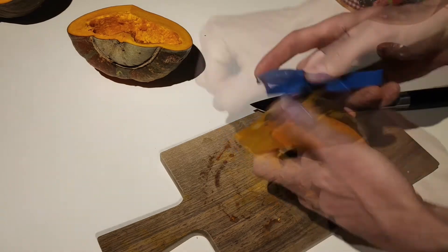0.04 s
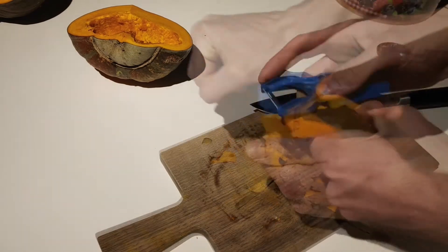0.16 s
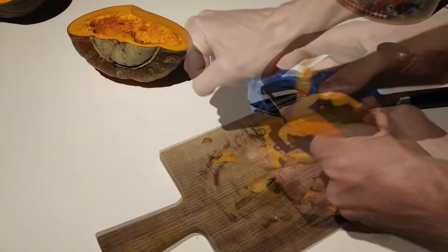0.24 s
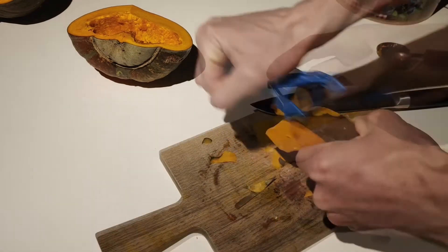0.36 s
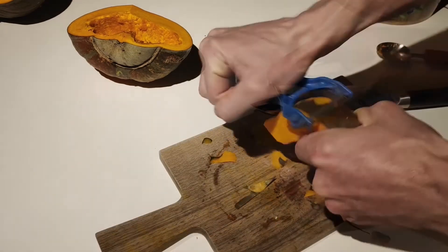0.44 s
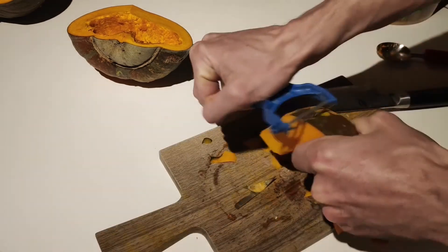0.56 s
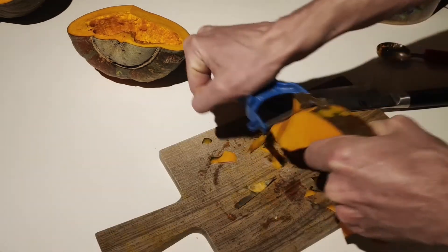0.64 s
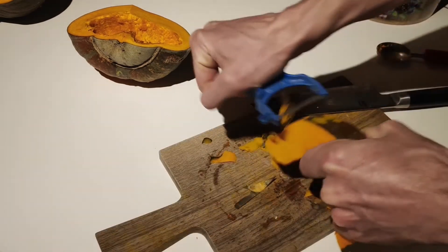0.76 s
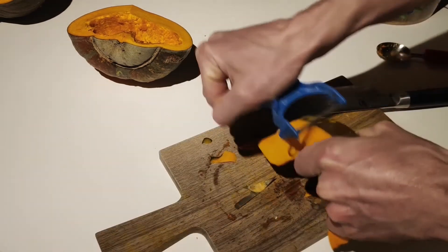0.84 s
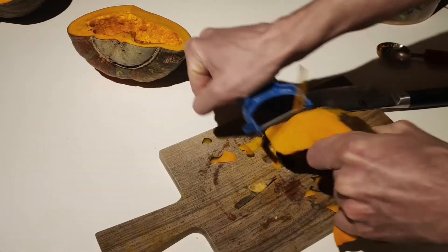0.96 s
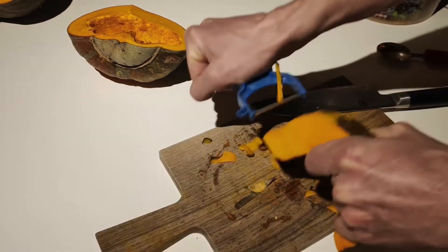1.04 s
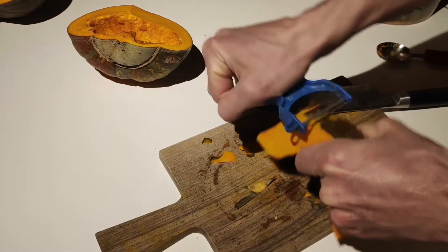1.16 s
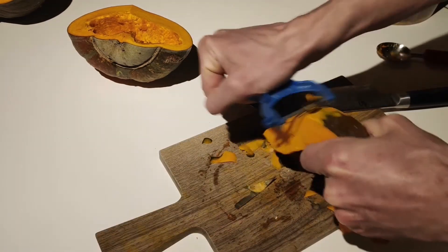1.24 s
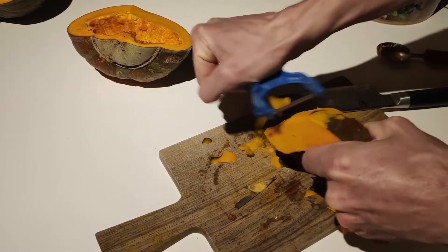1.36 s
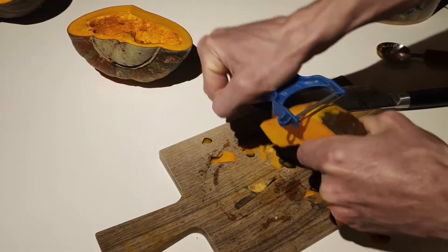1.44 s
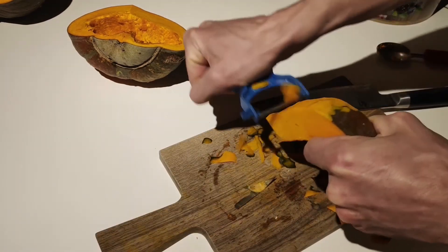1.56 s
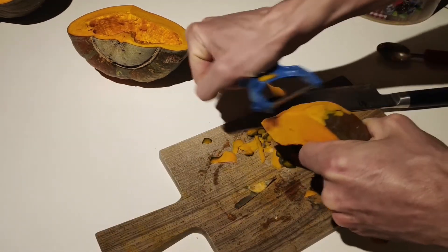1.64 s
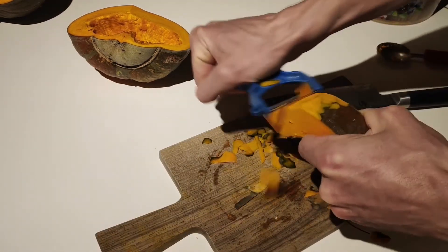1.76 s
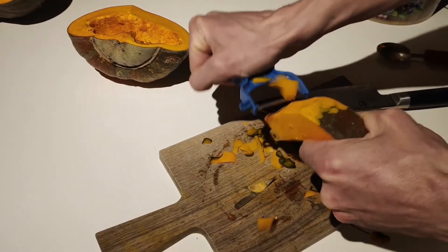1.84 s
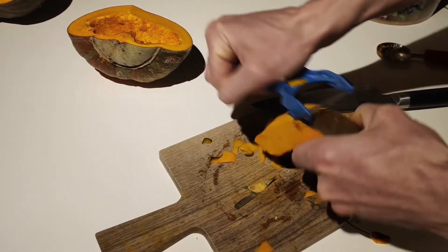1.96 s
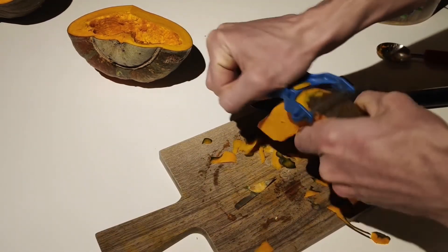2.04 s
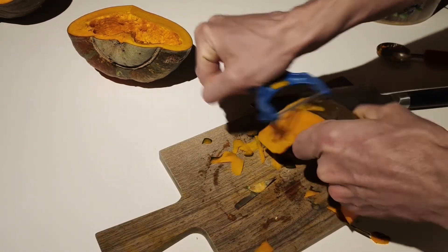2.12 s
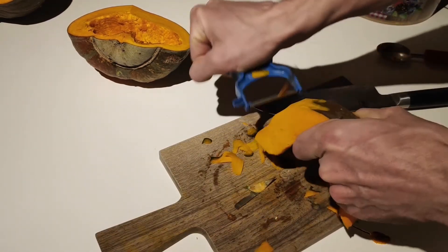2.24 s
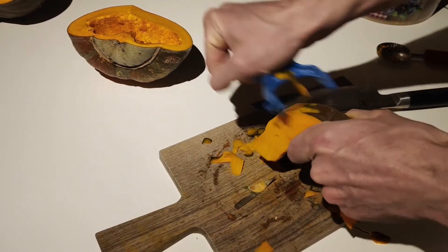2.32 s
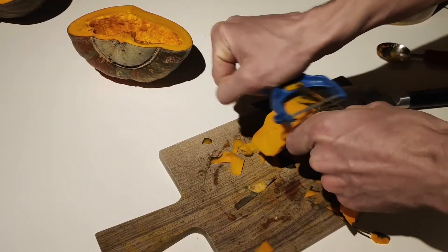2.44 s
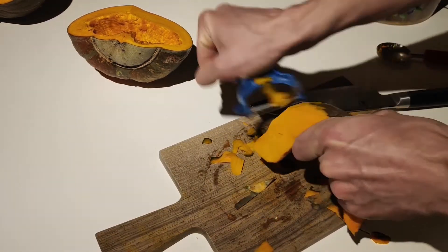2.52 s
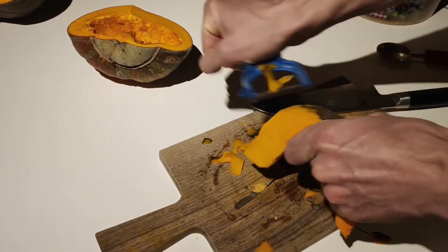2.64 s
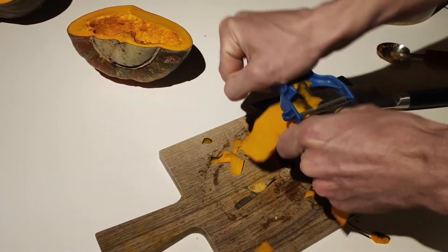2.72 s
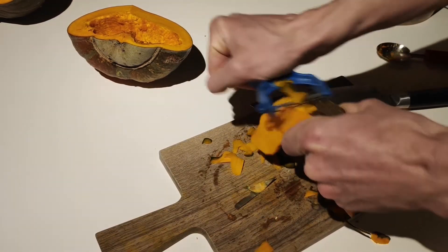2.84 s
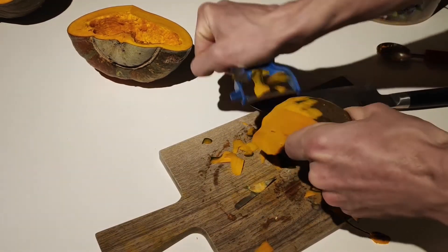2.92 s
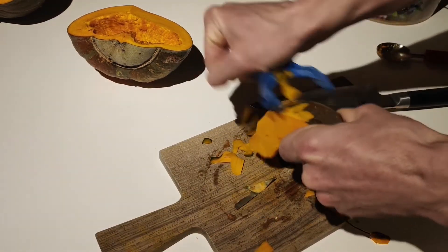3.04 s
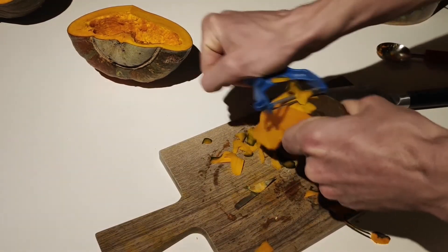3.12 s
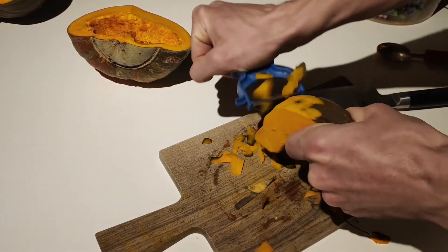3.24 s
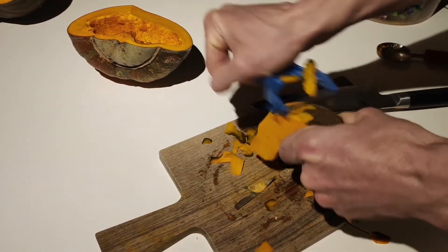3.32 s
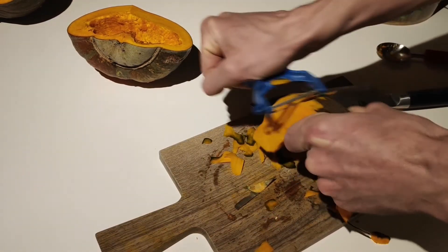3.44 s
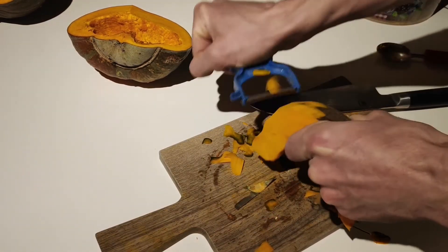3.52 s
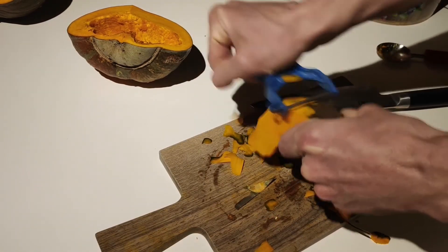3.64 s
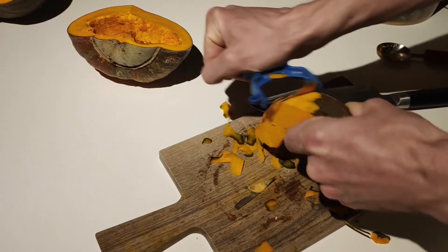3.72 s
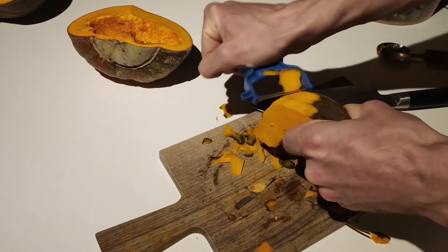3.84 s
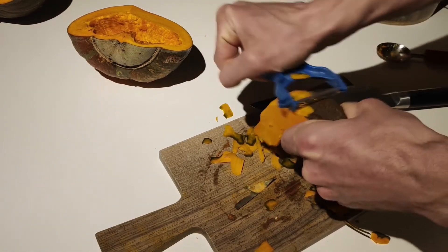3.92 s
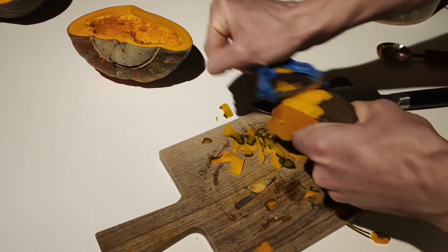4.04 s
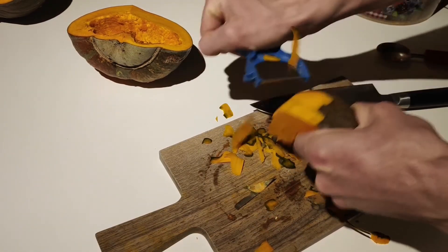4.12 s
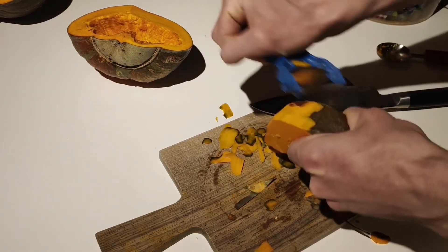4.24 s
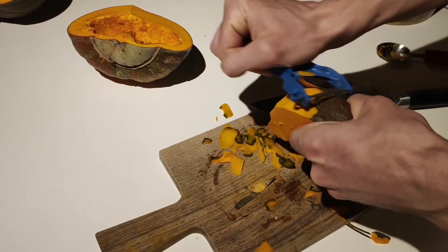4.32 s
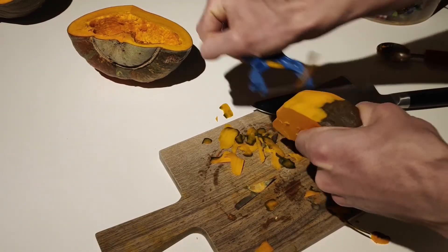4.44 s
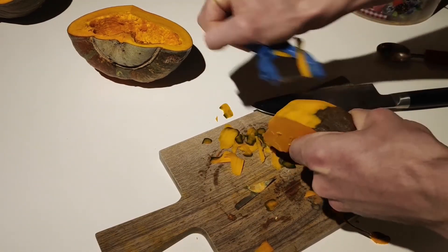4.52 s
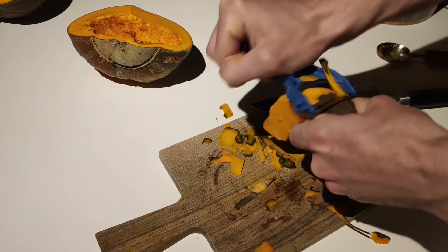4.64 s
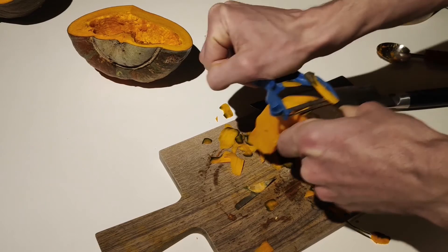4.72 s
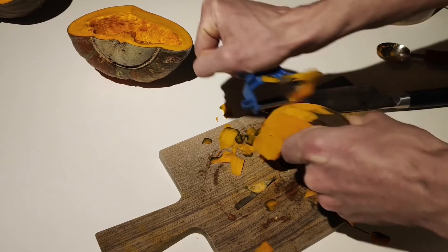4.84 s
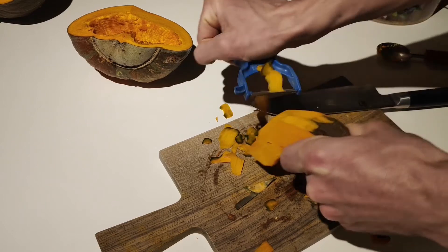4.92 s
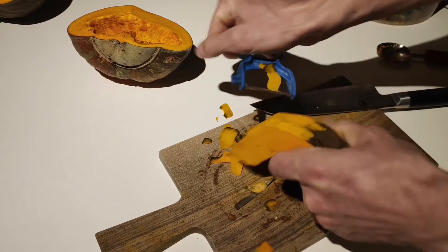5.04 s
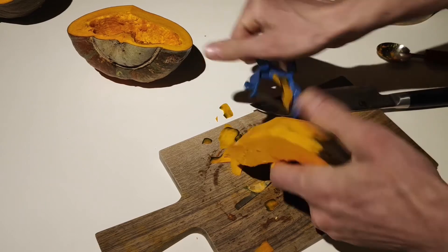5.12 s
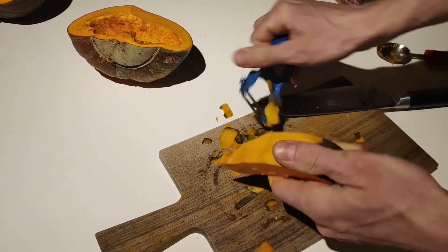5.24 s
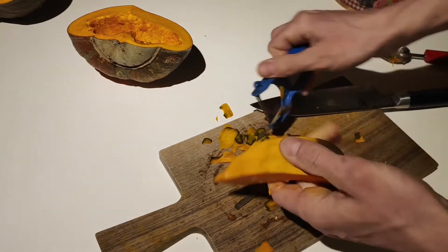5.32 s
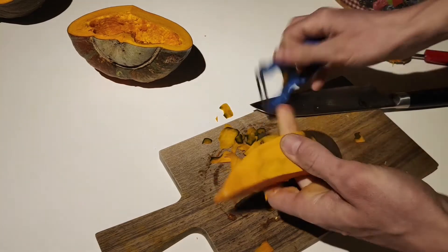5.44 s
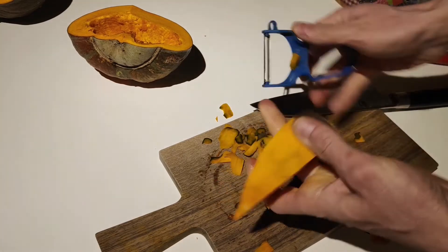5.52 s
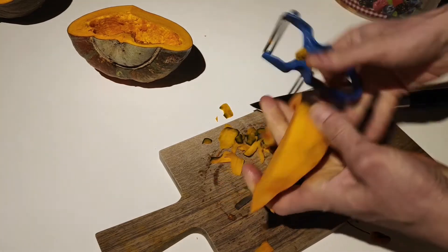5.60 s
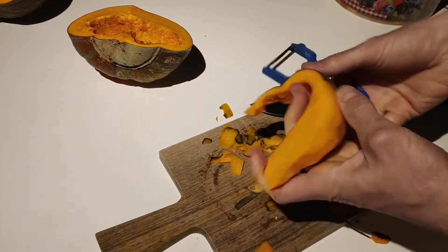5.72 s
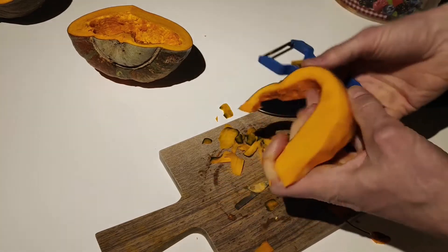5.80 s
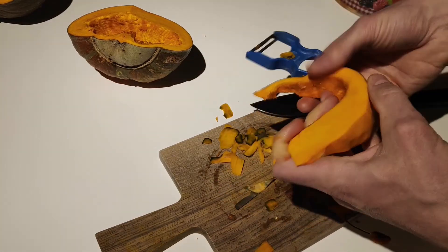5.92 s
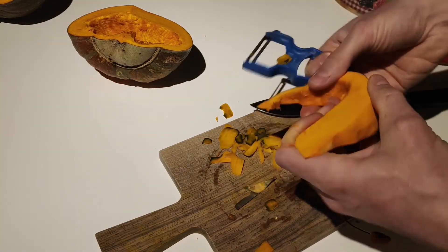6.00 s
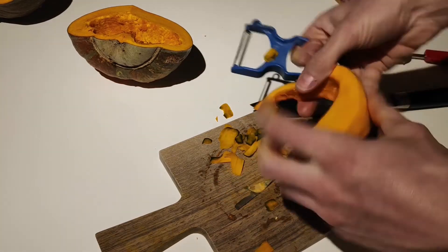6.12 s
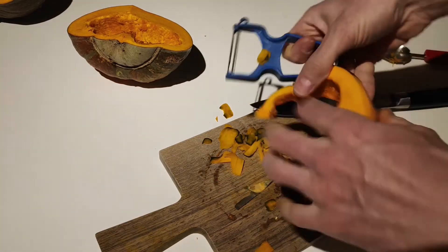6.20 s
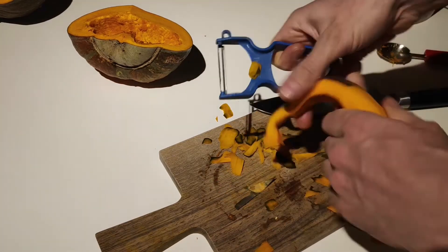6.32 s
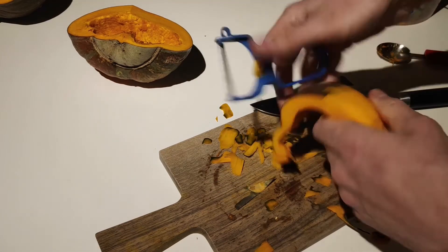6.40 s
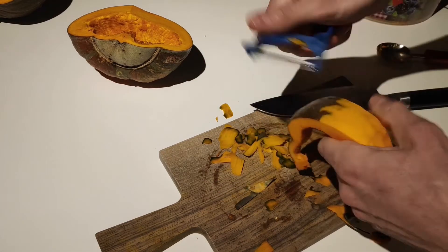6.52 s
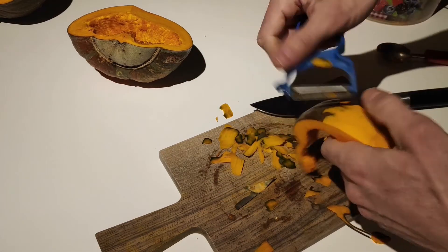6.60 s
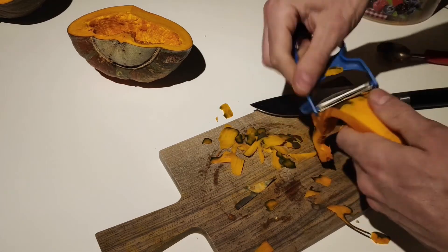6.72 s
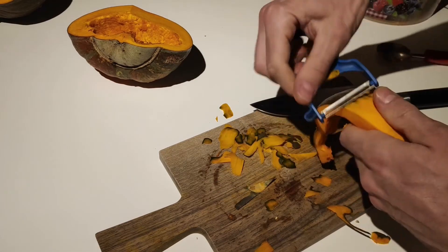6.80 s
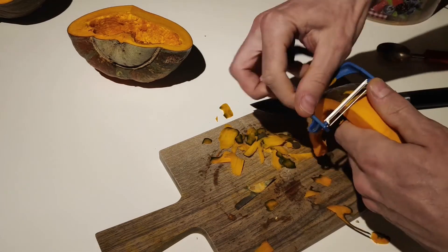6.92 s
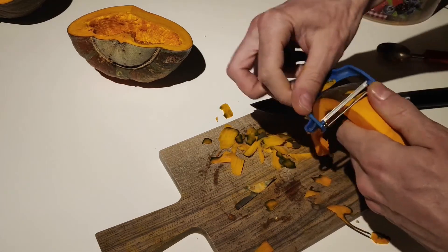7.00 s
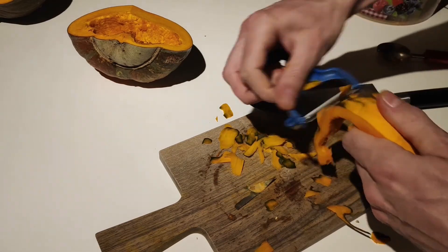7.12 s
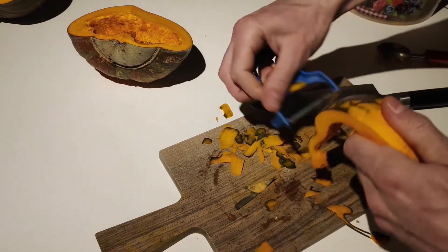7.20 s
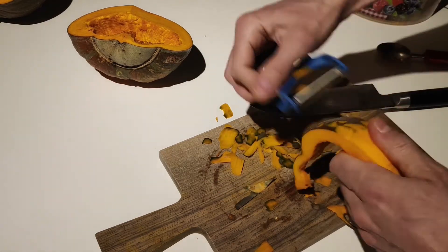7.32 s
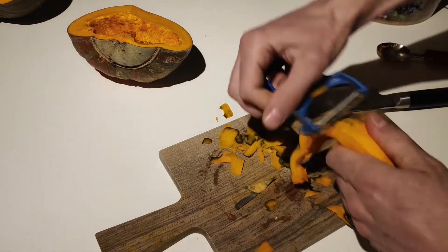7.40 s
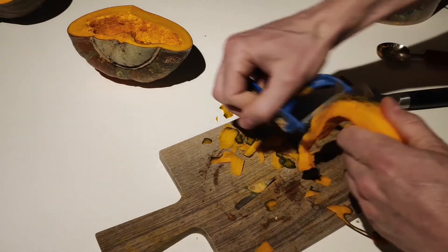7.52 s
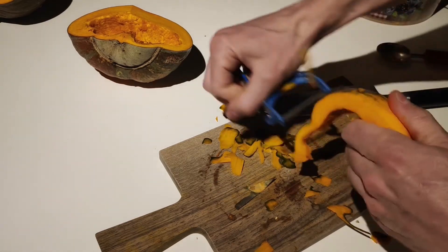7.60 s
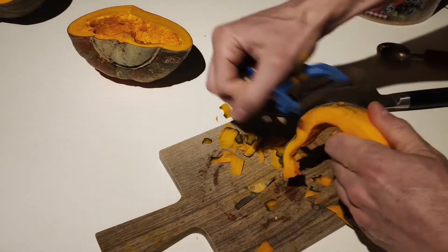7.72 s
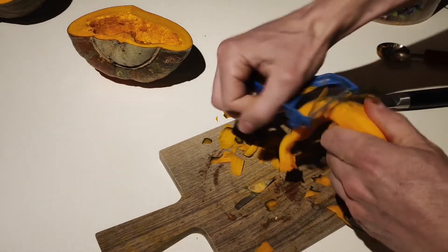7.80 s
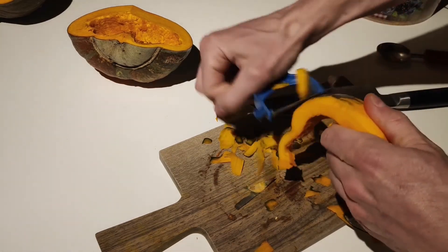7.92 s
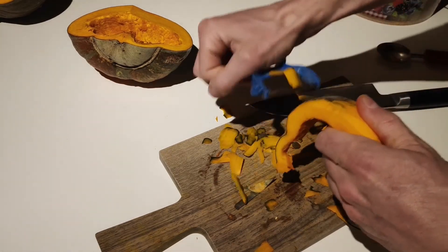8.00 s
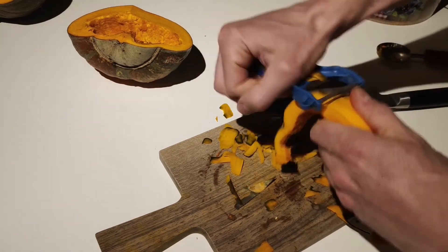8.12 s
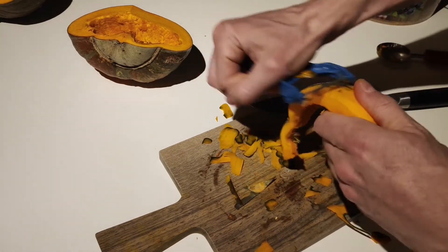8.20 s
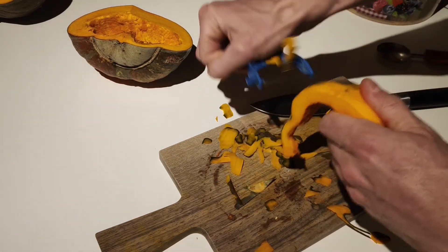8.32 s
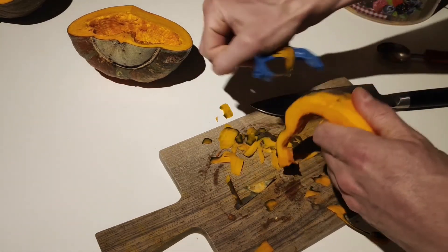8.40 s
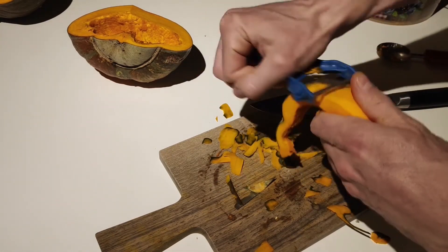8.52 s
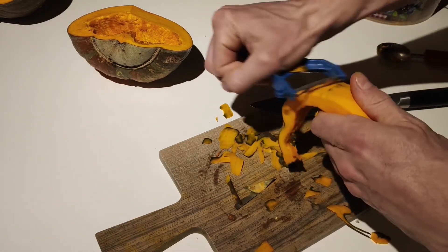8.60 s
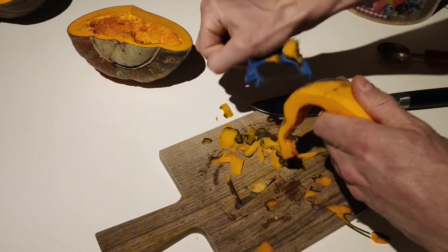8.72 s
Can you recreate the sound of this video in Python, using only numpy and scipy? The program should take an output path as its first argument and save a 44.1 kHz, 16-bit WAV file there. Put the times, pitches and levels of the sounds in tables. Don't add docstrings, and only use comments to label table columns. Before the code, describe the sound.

A small, hard kitchen heard through a close stereo microphone, with a low, slightly wavering refrigerator hum and soft fan air throughout. From 0.1 seconds a swivel peeler strikes and scrapes a pumpkin wedge, roughly three strokes each second. Each begins with a millisecond-scale rattling clack, swells into bright, dense, dry tearing, and ends in a snap. Dull little thumps come from the wedge; thin, faint high blade rings follow some strokes, clearest near 1.3, 2.5 and 4.4. Knocks are strongest around 1.5 and 3.7 to 4.6. After 4.9, cutting stops: irregular loose-blade ticks, peel crackles and finger rustles cluster around 5.1 to 5.7, thin out near 6, then return around 6.5. A light landing at 6.7 precedes renewed tearing strokes at about 7.1, 7.5, 7.8, 8.2 and 8.5, with crisp flicks and snaps through 8.7.

```python
import sys
import numpy as np
from scipy import signal
from scipy.fft import rfft, irfft
from scipy.io import wavfile
from scipy.ndimage import uniform_filter1d, minimum_filter1d

SR = 44100
rng = np.random.default_rng(int(sys.argv[2]) if len(sys.argv) > 2 else 0)


def persist_wave(psi):
    counts = np.round(np.clip(psi, -1, 1) * 32767).astype(np.int16)
    wavfile.write(sys.argv[1], SR, np.atleast_2d(counts).T)


def ratio(d):
    e = np.asarray(d, float) / 20
    return 10 ** e


N = 385875

# multiple, level_db
HUM_MULTIPLES = [(2, -5), (4, -4), (5, 0), (6, -5), (8, -10), (10, -8.5), (12, -9.5), (13, -8), (14, -6),
                 (15, -8), (16, -8.5), (17, -17), (19, -14), (23, -16), (27, -17)]
# frequency_hz, density_db (per Hz)
AIR_COLOUR = [(10, 1.5), (30, 0), (95, -13.5), (125, -4.5), (170, 4.5), (235, -9.5), (470, -8), (690, -9.5),
              (910, -9.5), (1300, -18), (2230, -18), (3480, -26.5), (5800, -26), (12000, -29.5),
              (16000, -37)]
# frequency_hz, likeness (1 = same)
AIR_LIKENESS = [(60, 0.74), (180, 1), (550, 0.45), (1650, 0.19), (4970, -1), (15000, -1.7)]
# frequency_hz, left_minus_right_db
PORT_TILT = [(500, 0.2), (2400, 0.5), (6000, -1), (7300, -11), (9000, 1), (11600, 10), (13000, 12),
             (16000, 15.5)]
# frequency_hz, density_db (per Hz)
KNOCK_COLOUR = [(900, -84), (1500, -38), (3000, -12), (4600, -2.5), (5900, -2), (8000, 2.5), (10500, 4.5),
                (12300, 3.5), (15300, 6), (16500, 1)]
# frequency_hz, density_db (per Hz)
TEAR_COLOUR = [(2500, -44.5), (4400, -5), (5700, 2.5), (7000, 0), (8500, 5), (10500, 5.5), (13000, 0.5),
               (15500, -6), (16500, -9)]
# frequency_hz, level_db, t60_s
BLADE_MODES = [(3780, -21, .012), (5900, -14, .012), (8300, -19, .035), (10300, -20, .02),
               (11850, -26, .04), (12200, -14, .015), (13650, -25, .04)]
# frequency_hz, level_db, t60_s
FRAME_MODES = [(900, -11, 0.0057), (1420, -20, 0.014), (1820, -12, 0.0011), (2270, -11, 0.012),
               (2880, -2.5, 0.0048)]
# frequency_hz, level_db, t60_s
FREE_BLADE_MODES = [(9950, -6, .13), (10520, -4, .18), (11820, 0, .28), (13650, -2, .24), (14920, -4, .2)]
# start_s, peak_db, pitch_hz
THUMPS = [(0.431, -21.5, 610), (1.183, -20.5, 630), (1.517, -15, 820), (2.019, -21, 605), (2.4, -26, 925),
          (2.852, -16, 710), (3.07, -29, 1010), (4.299, -35, 870), (4.639, -16, 780), (8.147, -14.5, 1000),
          (8.529, -24, 740)]
# start_s, level_db
RELEASES = [
    (0.3, -50),
    (1.315, -37),
    (2.527, -34),
    (2.565, -35),
    (2.93, -36),
    (3.905, -41),
    (4.3, -46),
    (4.437, -35),
    (8.29, -42),
]
# start_s, peak_db, rattle_ms, frame_db, skid_db
LANDINGS = [(0.0851, -10.5, 1.4, -16, -34), (0.4293, -11.5, 1.4, -23, -33), (0.5646, -9.5, 0.62, -3, -28),
            (0.8707, -3.5, 1, -10.5, -33), (1.1796, -6.5, 1.6, -15, -29.5), (1.4419, -4.5, 0.7, -14, -30),
            (1.7019, -5.5, 1.8, -3, -45), (2.0181, -9, 1.46, -6, -33.5), (2.4016, -2, 1.35, -16, -36),
            (2.7427, -2, 1.5, -11, -29.5), (3.072, -2.5, 1.6, -7.5, -31.5), (3.3674, -3.5, 2.2, -6.5, -28),
            (3.6553, -0.5, 1.06, -11.5, -31), (3.904, 2.5, 1.15, -17, -26.5), (4.298, -3, 1.5, -16, -35),
            (4.6357, 1, 1.94, -9, -30.5), (5.125, -9, 0.74, -17, -36), (5.267, -13.5, 1.8, -12, -35.5),
            (5.681, -10, 0.89, -13, -39), (6.7122, -8.5, 1.47, -9, -48), (7.437, -7.5, 0.51, -13, -35.5),
            (7.7979, -1.5, 0.62, -18, -38), (8.144, -3.5, 0.94, -13, -42), (8.527, -3.5, 1.9, -4, -34)]
LANDING_LIFTS = [-8, 0.5, 1, -1.5, 4, 0, 0, -3.5, 0, -0.5, -5, -2, -0.5, -1, -1.5, -1.5, -6, -7, 1, -0.5,
                 -2, 2, -0.5, -0.5]
# start_s, peak_db, rattle_ms, frame_db
CATCHES = [(0.6318, -8, 1, -8.5), (0.666, -8.5, 1.1, -12), (0.9924, -14.5, 2.4, -20),
           (1.1847, -6, 1.25, -19), (1.257, -8.5, 1.04, 4), (1.3134, -11, 1.9, -22), (1.4451, -8, 0.7, -5),
           (1.5166, 4.5, 1.58, -10), (1.5644, -3.5, 0.83, -9), (1.5754, -8, 0.98, -21),
           (1.8437, -14, 0.8, -14), (2.5254, -7, 1.5, -10), (2.5332, -9, 0.61, -9), (2.9144, -4.5, 1.1, -8),
           (2.929, -3, 1.3, -15), (3.2234, -2, 0.73, -26), (3.925, -13, 0.95, -14), (4.0718, -3, 1.26, -5),
           (4.087, -10.5, 1.2, -14), (4.4357, -6, 3.6, -13.5), (4.8438, -10, 1.1, -33),
           (4.8693, -12.5, 0.97, -30), (7.1825, -9.5, 1.4, -13), (7.198, -12.5, 1.1, -14),
           (7.448, -7.5, 1, -13), (7.5814, -8, 0.87, -9), (7.5997, -8, 0.71, -19),
           (7.942, -2.5, 0.91, -15.5), (8.274, -3, 1.2, -25), (8.6864, -2, 1, -6)]
CATCH_LIFTS = [-1, -3, -9, -1, -6, 1.5, 1, -7.5, -1, -3, -11, -8, -11, -11, -8, -7.5, 0, -1.5, 0, -1.5,
               -0.5, 1, 2, 2, -3.5, -4, -1, -7, -3, 3.5]
# start_s, peak_db, frame_db
FLICKS = [(0.094, -15, -16), (0.2798, -21, -18), (0.3003, -17.5, -16), (0.5392, -13.5, -13),
          (0.8834, -18, -14), (1.849, -12.5, -4), (2.1974, -16, -2), (2.3973, -9.5, 0), (2.5516, -10, -11),
          (2.8527, -20, 11), (3.5001, -16.5, -14), (3.8467, -27.5, 1), (3.8666, -18.5, -1),
          (3.8979, -12, -22), (4.1657, -28, -10), (4.1822, -23, -0.5), (4.2233, -30, -17),
          (5.5234, -21.5, -24), (7.0519, -40, -18), (7.3692, -28, -14), (7.82, -11, -1.5),
          (7.9542, -13, -19), (7.9653, -8, -13), (8.1045, -33, -14), (8.1216, -22, -27),
          (8.1483, -4.5, -15), (8.2812, -12, -6), (8.2898, -1.5, -7), (8.6708, -11, 0), (8.7006, -13, -11)]
# start_s, peak_db, frame_db
TICKS = [(5.036, -34, -16), (5.0633, -33.5, -14), (5.1706, -17, -16), (5.3577, -26, -16), (5.394, -20, -18),
         (5.444, -26, -16), (5.4698, -21.5, -8), (5.5076, -15, -7), (5.5541, -12.5, -19),
         (5.5594, -14, -16), (5.5692, -19, -16), (5.584, -17, -16), (5.5997, -17.5, -13),
         (5.6715, -14.5, -8.5), (5.9182, -25, -16), (6.0102, -29, -20), (6.023, -20, -13),
         (6.1739, -23, -22), (6.2314, -30, -28), (6.434, -27.5, -16), (6.4678, -18.5, -11),
         (6.488, -17.5, -8), (6.4984, -28, -16), (6.5212, -15, -12), (6.5344, -18, -7),
         (6.5677, -24.5, 4.5), (6.6, -25.5, 0), (6.6658, -18.5, -4), (6.682, -23, -12), (6.7934, -24, -16)]
# start_s, peak_db
SNAPS = [(0.1008, -16), (0.176, -19.0), (0.2125, -22.0), (0.2412, -22), (0.2673, -33.0), (0.3055, -24.0),
         (0.3132, -28.0), (0.458, -28), (0.6224, -20), (0.6523, -18), (1.3312, -15), (1.3996, -36),
         (1.4673, -16), (1.508, -15.0), (1.7471, -14), (1.8583, -24), (1.9248, -35.0), (3.2421, -11),
         (3.335, -29), (3.4618, -19.0), (3.4897, -22), (7.0939, -27.0), (7.2778, -31.0), (7.366, -36),
         (7.8677, -15), (8.1375, -40), (8.518, -32), (8.5451, -19), (8.5542, -24), (8.6597, -13.0)]
# start_s, peak_db
CRACKLES = [(4.9945, -35.0), (5.0306, -34.0), (5.0699, -36), (5.132, -15), (5.1399, -15), (5.1477, -21.0),
            (5.1573, -22), (5.2739, -17), (5.2845, -21), (5.31, -27.0), (5.3152, -27.0), (5.3218, -28.0),
            (5.3832, -25), (5.5297, -23), (5.5366, -22), (5.5646, -17.0), (5.5761, -20), (5.6051, -18.0),
            (5.6534, -36), (5.9509, -28), (6.4425, -32), (6.4626, -27), (6.51, -26), (6.5305, -17),
            (6.5432, -25), (6.7991, -23.0), (7.0188, -31)]
# bite_s, deepest_s, leave_s, deepest_db, swell_db
CUTS = [(0.13, 0.183, 0.27, -30, 6), (0.575, 0.62, 0.7, -24.5, 14), (.9, 0.948, 1, -24.5, 8),
        (1.204, 1.268, 1.37, -28, 13), (1.476, 1.567, 1.59, -24, 10), (1.718, 1.766, 1.88, -25, 12),
        (2.083, 2.176, 2.22, -26, 12.5), (2.463, 2.537, 2.59, -23.5, 14.5), (2.81, 2.872, 2.96, -25, 8),
        (3.12, 3.189, 3.31, -24.5, 8), (3.405, 3.455, 3.53, -28.5, 11), (3.66, 3.762, 3.8, -24, 9),
        (3.995, 4.044, 4.15, -24.5, 8.5), (4.352, 4.44, 4.43, -24.5, 11.5), (4.764, 4.81, 4.9, -21.5, 14.5),
        (5.51, 5.535, 6.1, -44, 3), (5.92, 5.932, 5.965, -41, 10), (6.01, 6.025, 6.3, -45, 1),
        (6.468, 6.535, 6.62, -40, 5), (6.718, 6.74, 6.95, -43, 3), (7.048, 7.157, 7.25, -27, 15.5),
        (7.499, 7.565, 7.615, -24.5, 13.5), (7.804, 7.956, 8.02, -26, 6.5), (8.17, 8.278, 8.31, -23, 12.5),
        (8.547, 8.645, 9.3, -25, 8)]
# start_s,
# length_s, level_db
RUSTLES = [(0.273, .06, -46), (1.317, 0.028, -38), (1.84, 0.024, -41), (2.016, .004, -25.5),
           (2.739, .004, -27), (3.86, 0.025, -36.5), (5.119, 0.042, -36), (5.356, 0.1, -44.5),
           (5.463, 0.026, -42), (5.571, 0.067, -38.5), (6.238, 0.15, -57), (6.434, .03, -46),
           (6.664, .045, -39), (6.786, .04, -43), (7.008, 0.026, -45), (7.363, 0.07, -47.5)]


def rms_one(x):
    return x / np.sqrt(np.mean(x ** 2) + 1e-20)


def unit(response):
    return response / np.linalg.norm(response, axis=-1, keepdims=True)


def at_hz(points, hz):
    point_hz, value = np.array(points).T
    return np.interp(np.log(hz + 1), np.log(point_hz), value)


def coloured(x, points, scale=1, size=2048):
    cepstrum = irfft(scale * at_hz(points, np.fft.rfftfreq(size, 1 / SR)) * np.log(10) / 20)
    cepstrum[1:size // 2] *= 2
    cepstrum[size // 2 + 1:] = 0
    response = irfft(np.exp(rfft(cepstrum)))
    if scale == 1:
        response = unit(response)
    response = response.reshape((1,) * (x.ndim - 1) + (-1,))
    return signal.oaconvolve(x, response, axes=-1)[..., :x.shape[-1]]


def filtered(x, hz, kind):
    return signal.sosfilt(signal.butter(2, hz, kind, fs=SR, output="sos"), x)


def evened(x, width_hz=1500):
    spectrum = rfft(x)
    humps = uniform_filter1d(np.abs(spectrum) ** 2, size=int(width_hz * x.shape[-1] / SR), axis=-1)
    flat = irfft(spectrum / np.sqrt(humps + 1e-20), x.shape[-1])
    flat[..., -64:] = 0
    return unit(flat)


def drift(rate, step=1):
    r = np.exp(-80 * np.pi * rate / SR)
    slow = signal.lfilter([1], [1, -2 * r, r * r], rng.standard_normal(N // 40 + 2002))[2000:]
    return np.interp(np.arange(0, N, step) / 40, np.arange(len(slow)), rms_one(slow))


def grains(per_s, spread_db, shape):
    sizes = ratio(spread_db * np.minimum(rng.exponential(1, shape), 5)) * rng.choice([-1, 1], shape)
    return rms_one(sizes * (rng.random(shape) < per_s / SR))


def ring(modes, count, spread_db, size=4096, slack=0.032):
    hz, db, t60 = np.transpose(modes)[:, :, None]
    t = np.arange(size) / SR
    decay = ratio(db - 60 * t / t60)
    grips = np.array([decay * np.sin(2 * np.pi * hz * shift * t) for shift in (1 - slack, 1, 1 + slack)])
    shape = (count, len(modes))
    strengths = ratio(rng.normal(0, spread_db, shape)) * rng.choice([-1, 1], shape)
    grip = rng.choice(3, count, p=[.2, .6, .2])
    return np.einsum("km,kmt->kt", strengths, grips[grip])


def refrigerator():
    step, compressor_hz, hum_db = 10, 33.07, -48
    speed = compressor_hz * (1 + .002 * drift(1.5, step))
    turn = 2 * np.pi * np.cumsum(speed) * step / SR
    out = 0
    for multiple, db in HUM_MULTIPLES:
        start = rng.uniform(0, 2 * np.pi)
        skew = rng.normal(0, 0.043) * multiple
        phase = multiple * turn + start + (.3 + .025 * multiple) * drift(4.0, step)
        out = out + ratio(db + 3.1 * drift(6.0, step)) * np.sin(phase + skew * np.array([[.5], [-.5]]))
    hum = signal.resample_poly(out, step, 1, axis=1)[:, :N]
    return ratio(hum_db) * rms_one(hum) * ratio(np.array([[.4], [-.4]]))


def air():
    air_db = -46
    mid, side = (rfft(coloured(noise, AIR_COLOUR)) for noise in rng.standard_normal((2, N)))
    alike = np.clip(at_hz(AIR_LIKENESS, np.fft.rfftfreq(N, 1 / SR)), 0, 1)
    both = np.sqrt(1 + alike) * mid + np.sqrt(1 - alike) * side * [[1], [-1]]
    return ratio(air_db) * rms_one(irfft(both, N))


def kitchen(count):
    wall_t60_s, treble_t60_s, wall_db = .44, .28, -8
    early_t60_s, early_db = .008, -1
    t, size = np.arange(int(.25 * SR)) / SR, 512
    walls = rng.standard_normal((count, 2, len(t)))
    dull = uniform_filter1d(walls, size=3, axis=-1)
    walls = dull * ratio(-60 * t / wall_t60_s) + (walls - dull) * ratio(-60 * t / treble_t60_s)
    out = ratio(wall_db) * unit(walls * np.minimum(t / .008, 1))
    t = t[:size]
    scatter = rng.standard_normal((count, 2, size)) * ratio(-60 * t / early_t60_s) * (t > .0001)
    early = ratio(early_db) * unit(scatter)
    direct = t == 0
    out[..., :size] += evened(early + direct) * np.hypot(1, ratio(early_db))
    return out


def in_kitchen(times, sounds):
    heard = signal.fftconvolve(sounds[:, None], kitchen(len(times)), axes=-1)
    length = heard.shape[-1]
    out = np.zeros((2, N + length))
    for s, sound in zip(times, heard):
        start = round(s * SR)
        out[:, start:start + length] += sound
    return out[:, :N]


def thumps():
    s, db, hz = np.transpose(THUMPS)[:, :, None]
    t = np.arange(1024) / SR
    phase = 2 * np.pi * hz * (t + 0.00053 * (1 - np.exp(-t / 0.0003)))
    level = ratio(db - 9.5 - 60 * t / 0.012) * np.minimum(t / 0.00066, 1)
    return in_kitchen(s[:, 0], level * np.sin(phase))


def singing():
    s, db = np.transpose(RELEASES)
    rings = ring(FREE_BLADE_MODES, len(s), spread_db=0.5, size=16384, slack=0)
    return in_kitchen(s, ratio(db)[:, None] * rings)


def contacts():
    rows = [(*row[:4], lift_db) for row, lift_db in zip(LANDINGS + CATCHES, LANDING_LIFTS + CATCH_LIFTS)]
    for table, rattle_ms, lift_db in ((FLICKS, 0.58, 0), (TICKS, 0.97, -3.5)):
        rows += [(s, db, rattle_ms, frame_db, lift_db) for s, db, frame_db in table]
    rows += [(s, db, 0.44, -23, -2) for s, db in SNAPS + CRACKLES]
    knock_db = 2.5
    return np.array(rows) + [0, knock_db, 0, 0, 0]


def knocks():
    crack_db, blade_db, frame_level_db, lift_hz = -9.5, -24.5, -30.5, 9530
    s, db, rattle_ms, frame_db, lift_db = contacts().T[:, :, None]
    count, size = len(s), 2048
    length = np.clip(rattle_ms, .3, 4) * SR / 1000
    age = np.arange(size) / length
    shape = np.minimum(age / 0.74, 1) * np.exp(-(age / 2.55) ** 2.8)
    chatter = grains(16000, 2.65, (count, size)) * shape
    burst = evened(chatter + 1e-12) * np.sqrt(length) * ratio(db)
    blade_ring = ring(BLADE_MODES, count, spread_db=3.0, size=size)
    blade = signal.fftconvolve(burst, blade_ring, axes=1)[:, :size]
    frame_ring = ring(FRAME_MODES, count, spread_db=2.5, size=size)
    frame = signal.fftconvolve(burst * ratio(frame_db), frame_ring, axes=1)[:, :size]
    metal = ratio(crack_db) * coloured(burst, KNOCK_COLOUR) + ratio(blade_db) * blade
    treble = filtered(metal, lift_hz, "high")
    low = filtered(metal, lift_hz, "low")
    return in_kitchen(s[:, 0], low - treble * ratio(lift_db) + ratio(frame_level_db) * frame)


def pressure():
    skid_s, skid_fade_db_per_s, skid_dull_db = 0.14, 127, -12
    ease_db_per_s, cut_dull_db, rustle_swell_db = 105, -17, -9
    lift_s, lift_db = 0.026, 25
    strokes = [(s, s, s + skid_s, db, 0, skid_fade_db_per_s, skid_dull_db) for s, *_, db in LANDINGS]
    strokes += [(*cut, ease_db_per_s, cut_dull_db) for cut in CUTS]
    strokes += [(s, s + length / 4, s + length, db, rustle_swell_db, ease_db_per_s, skid_dull_db)
                for s, length, db in RUSTLES]
    t, power, dull = np.arange(N) / SR, np.zeros(N), np.zeros(N)
    for bite, deepest, leave, db, swell_db, ease, dull_db in strokes:
        at = slice(round(bite * SR), round((leave + lift_s) * SR))
        last_db = db - ease * (leave - deepest)
        corners_s = [bite, deepest, leave, leave + lift_s]
        corners_db = [db - swell_db, db, last_db, last_db - lift_db]
        shape = ratio(np.interp(t[at], corners_s, corners_db)) ** 2
        power[at] += shape
        dull[at] += shape * ratio(dull_db) ** 2
    return np.sqrt(power), np.sqrt(dull / (power + 1e-20))


def tearing():
    wander_db, firm_db = 2.8, -29
    treble_follows = 0.31
    level, dull = pressure()
    clumps = ratio(1.2 * drift(45) + 2.0 * drift(250))
    crackle = grains(10000, 2.9, N) * uniform_filter1d(level, size=300) * clumps
    bright = coloured(crackle, TEAR_COLOUR)
    level_db = 20 * np.log10(uniform_filter1d(level, size=2000) + 1e-4)
    light_db = treble_follows * np.minimum(level_db - firm_db, 0)
    edges_hz = np.geomspace(3500, 18000, 7)
    torn = 0
    for k, band_hz in enumerate(zip(edges_hz, edges_hz[1:])):
        gain = ratio(wander_db * drift(6.5) + light_db * k / 5)
        torn = torn + filtered(bright, band_hz, "band") * gain * (-1) ** k
    dull_crackle = filtered(crackle * dull, [1500, 4800], "band")
    torn = ratio(-8.5) * torn + ratio(5.0) * dull_crackle
    size = 2048
    pieces = np.pad(torn, (0, -N % size)).reshape(-1, size)
    return in_kitchen(np.arange(len(pieces)) * size / SR, pieces)


def scene():
    return refrigerator() + air() + thumps() + singing() + knocks() + tearing()


def band_limit(x):
    return signal.sosfilt(signal.butter(12, 16740, fs=SR, output="sos"), x)


def record(dry):
    ceiling, cutoff_hz, top_hz, top_gate_db = 1.49, 15700, 16600, -25
    ports = np.array([coloured(side, PORT_TILT, scale=half) for side, half in zip(dry, (.5, -.5))])
    headroom = minimum_filter1d(ceiling / np.maximum(np.abs(ports), ceiling), size=41, axis=1)
    ports = ports * uniform_filter1d(headroom, size=31, axis=1)
    body, whole = (signal.sosfiltfilt(signal.ellip(8, .1, 40, hz, fs=SR, output="sos"), ports)
                   for hz in (cutoff_hz, top_hz))
    top = whole - body
    passes = uniform_filter1d(top ** 2, size=256, axis=1) > ratio(top_gate_db) ** 2
    mix = body + .3 * top * uniform_filter1d(1. * passes, size=128, axis=1)
    return band_limit(np.clip(mix, -1, 1))


dry = scene()
out = record(dry)
persist_wave(out)
```